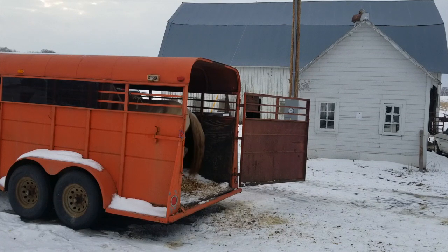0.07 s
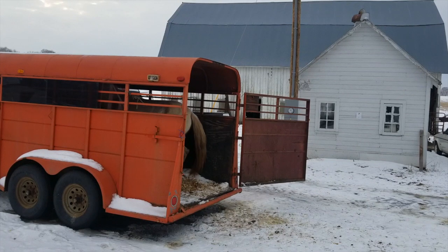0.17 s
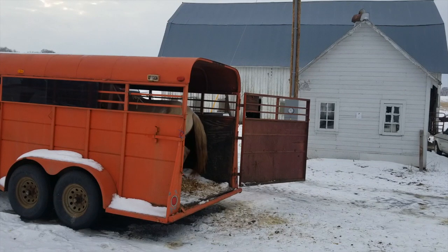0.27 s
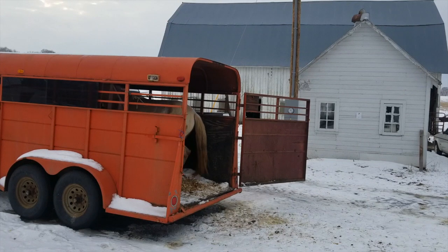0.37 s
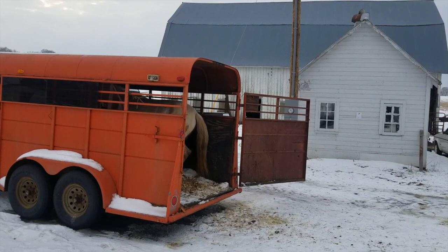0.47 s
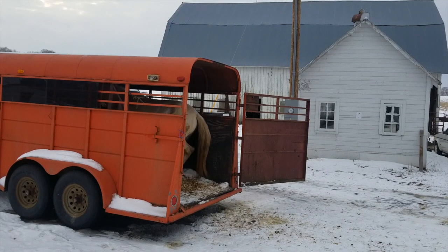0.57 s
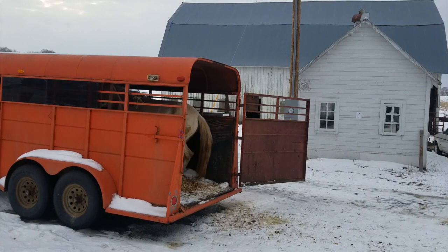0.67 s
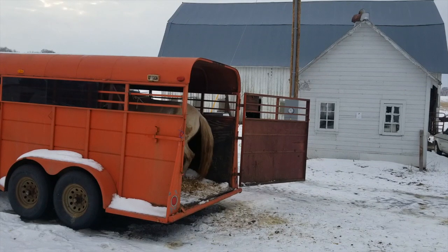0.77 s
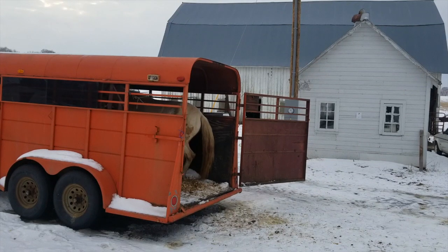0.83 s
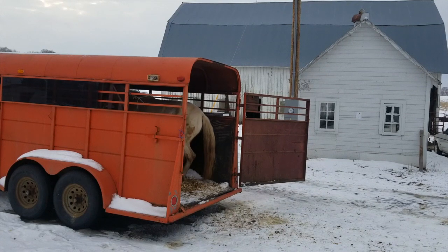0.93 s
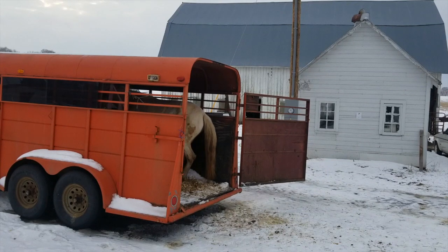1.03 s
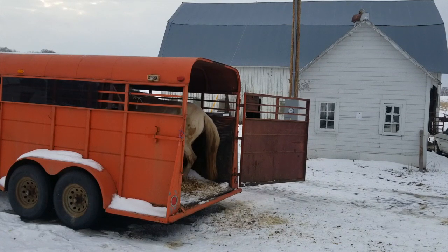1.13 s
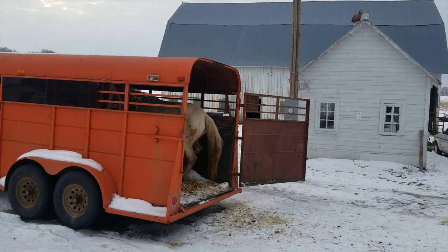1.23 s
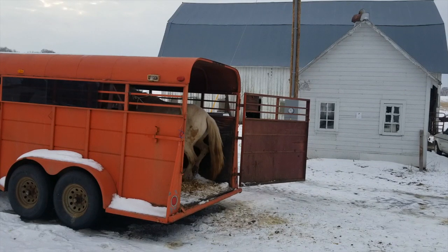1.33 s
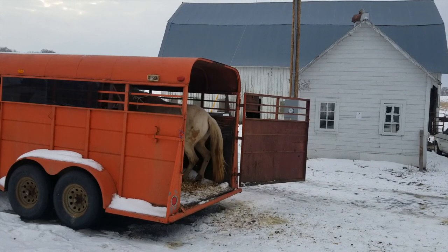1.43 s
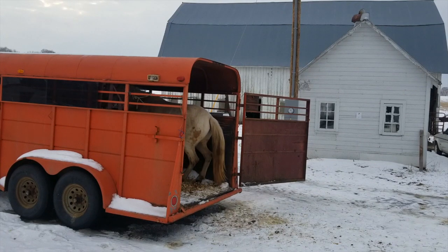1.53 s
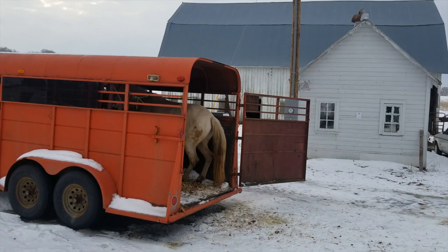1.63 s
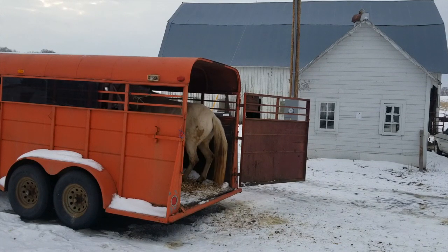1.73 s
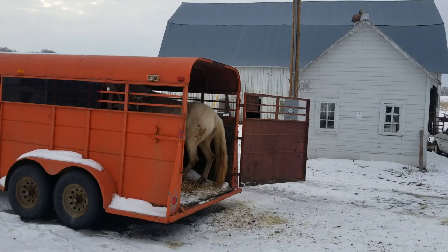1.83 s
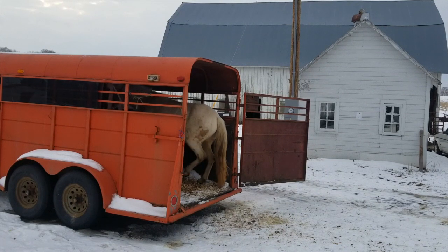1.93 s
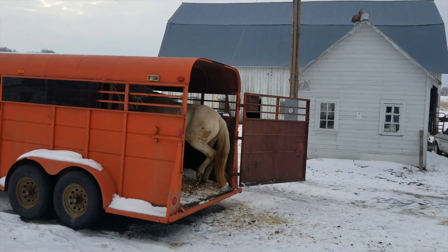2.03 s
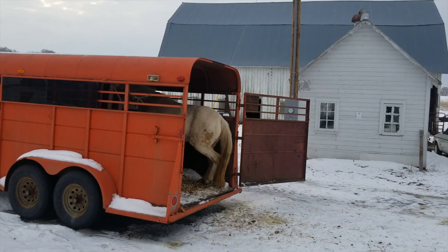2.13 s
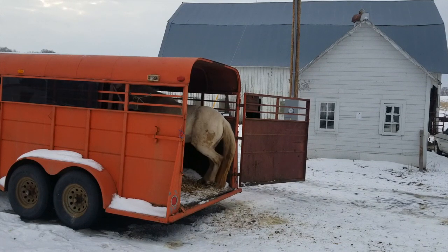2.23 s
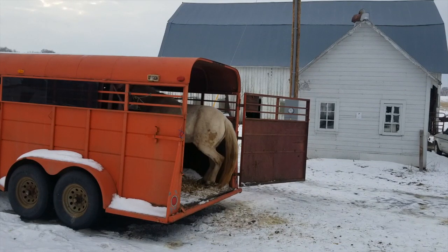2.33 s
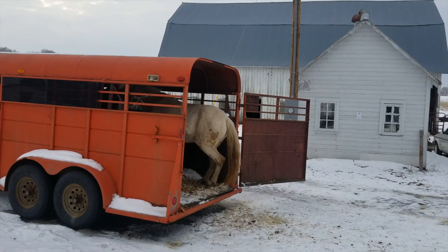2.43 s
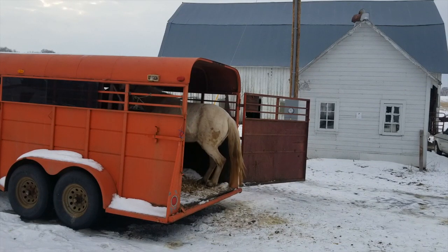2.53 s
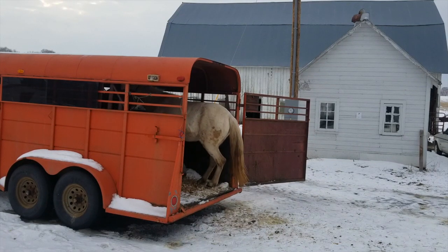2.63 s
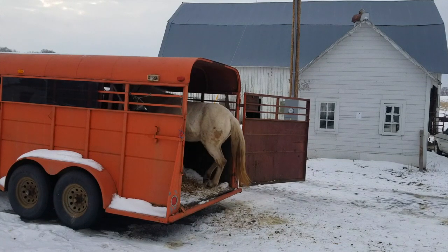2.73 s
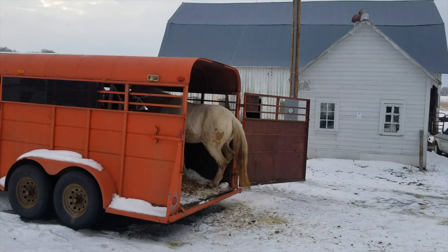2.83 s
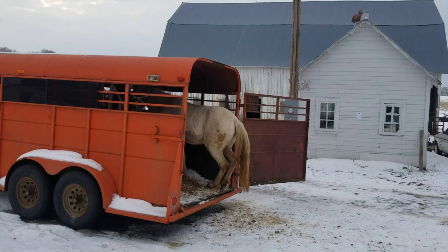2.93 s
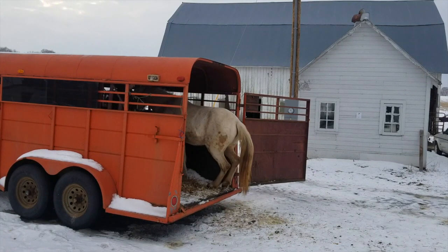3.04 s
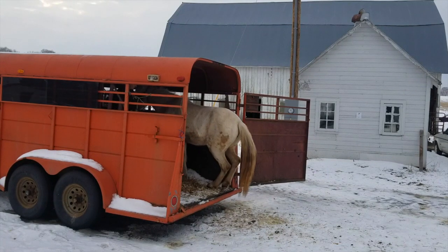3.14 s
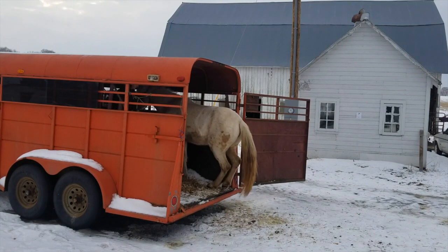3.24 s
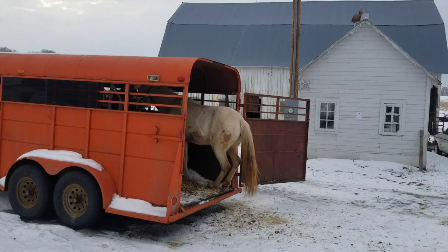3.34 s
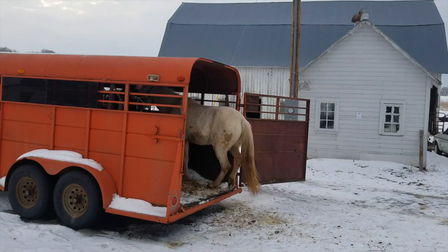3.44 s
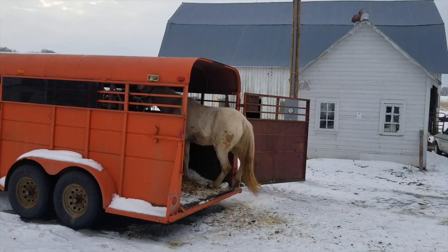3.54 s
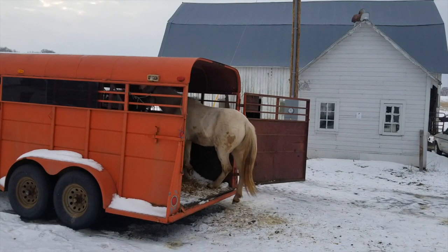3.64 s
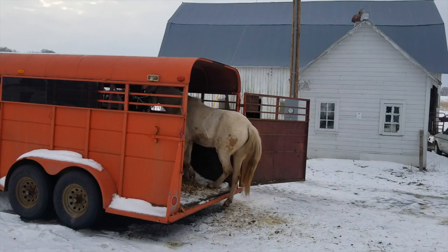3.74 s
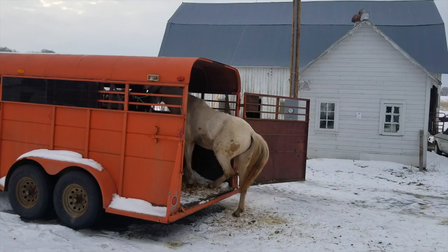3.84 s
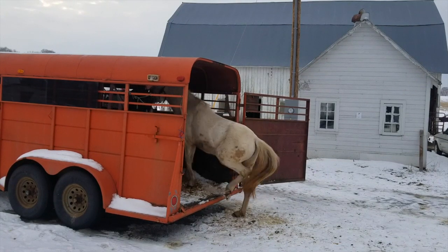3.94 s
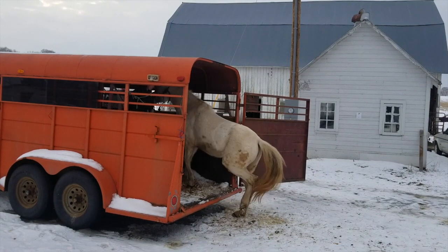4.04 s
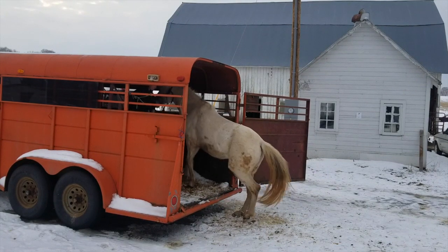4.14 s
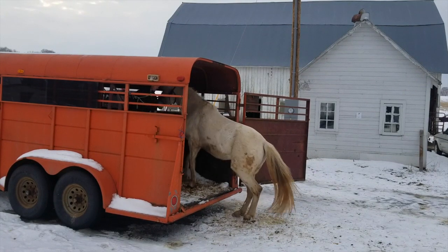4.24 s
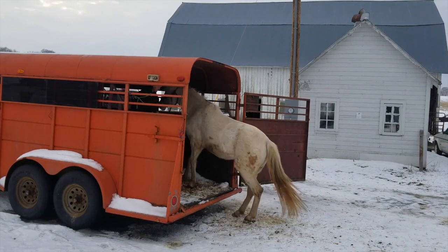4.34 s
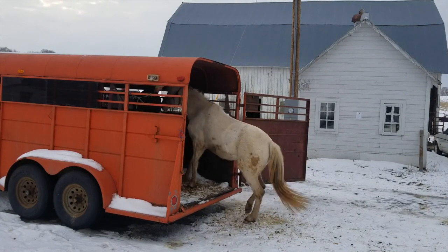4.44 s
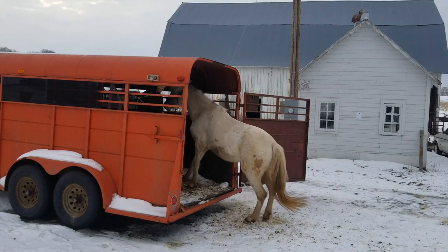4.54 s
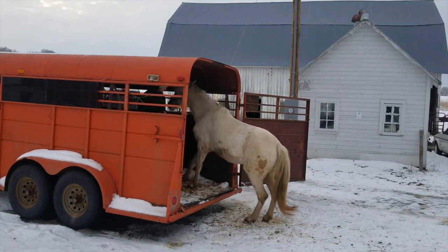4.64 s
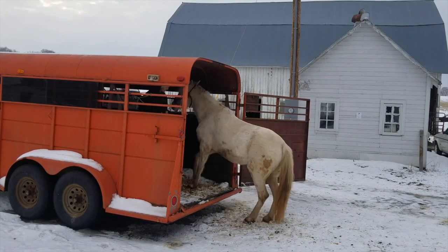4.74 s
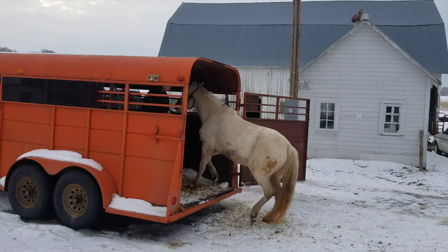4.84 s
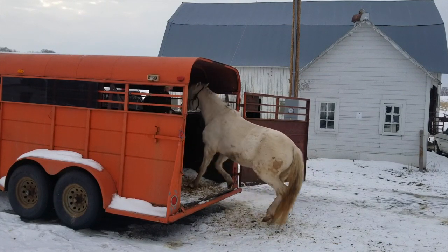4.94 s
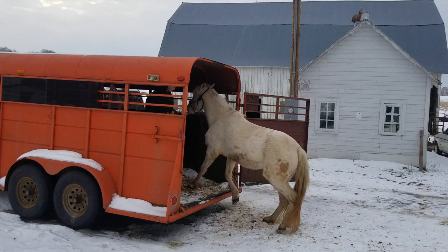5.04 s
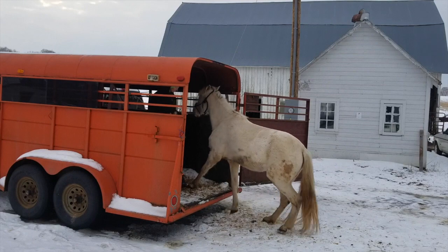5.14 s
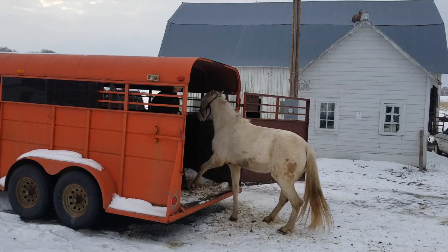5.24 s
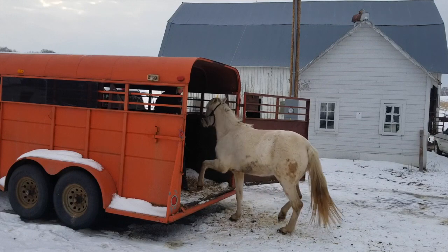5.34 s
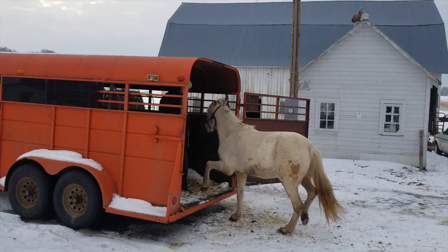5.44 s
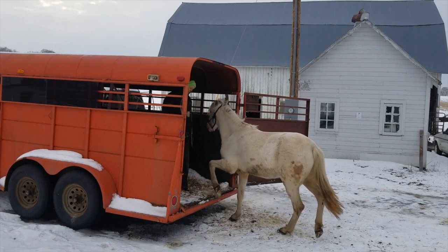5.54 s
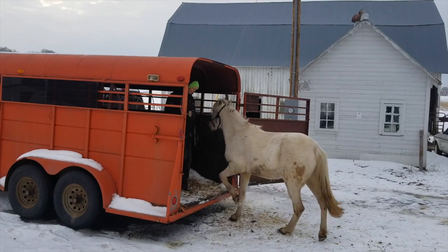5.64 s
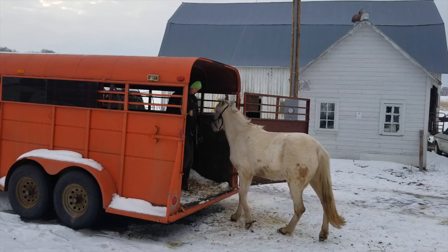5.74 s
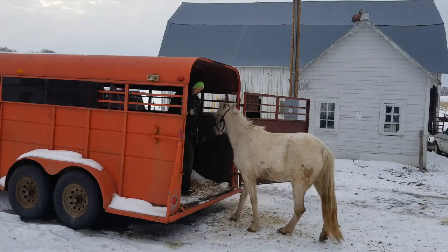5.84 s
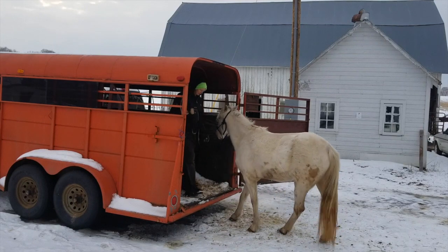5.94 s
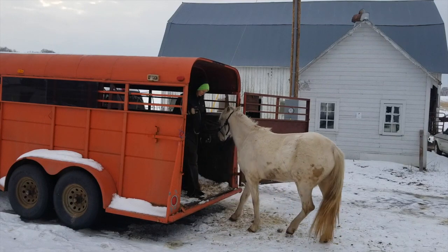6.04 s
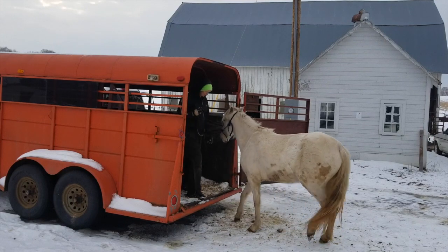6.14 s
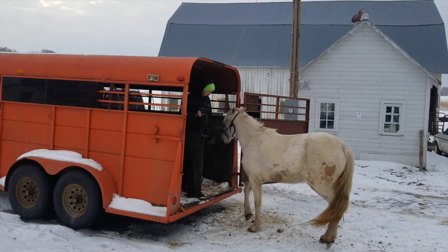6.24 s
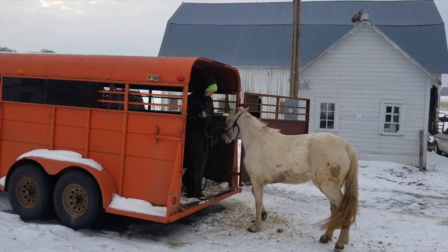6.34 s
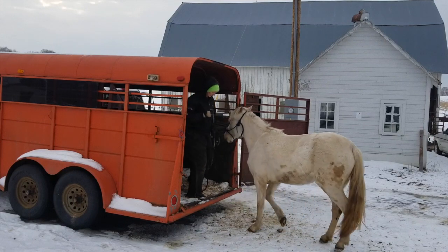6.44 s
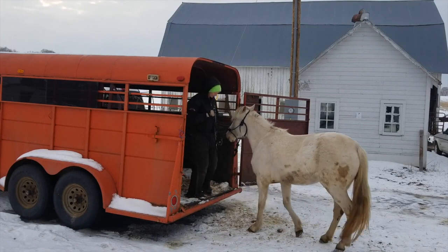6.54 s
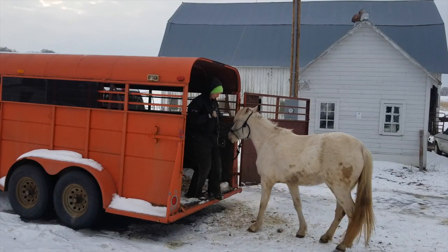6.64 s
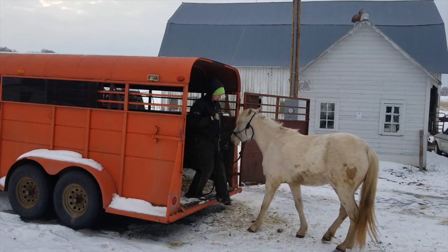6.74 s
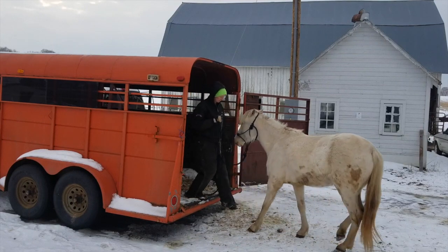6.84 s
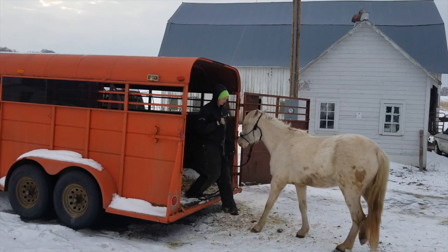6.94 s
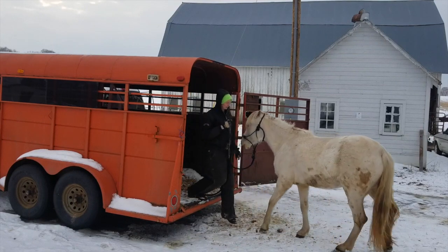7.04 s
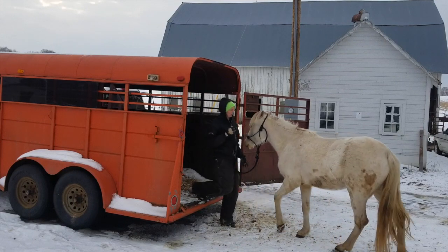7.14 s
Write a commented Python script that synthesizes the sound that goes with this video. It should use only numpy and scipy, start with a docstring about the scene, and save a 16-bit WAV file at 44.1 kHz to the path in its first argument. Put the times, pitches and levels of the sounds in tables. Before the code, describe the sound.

A horse backs out of a hollow steel trailer, hooves booming on the floor, then clopping and crunching onto frozen snow and straw.

```python
"""A snowy farmyard: a horse backs out of a steel stock trailer, heard from several metres away.
Hooves knock on the floor, whose boom and panel rings are sums of decaying sinusoids; filtered noise adds clatter.
Hollow hoof clops are short modal rings; scrapes and the crunch of frozen snow and straw are showers of clicks.
A grumbling trailer, faint echoes and a low outdoor rumble lie behind; all levels are set ahead of the microphones.
The left microphone is peaky and hisses, the right one is muffled."""
import sys
import numpy as np
from scipy import signal
from scipy.fft import rfft, irfft, next_fast_len
from scipy.io import wavfile

SR = 44100
rng = np.random.default_rng(int(sys.argv[2]) if len(sys.argv) > 2 else 0)


def file_out(sig):
    """Save sig as 16-bit WAV at sys.argv[1]."""
    # one column per channel
    cols = np.atleast_2d(sig).T
    # limit, then scale
    lim = np.clip(cols, -1, 1)
    pcm = np.round(lim * 32767).astype(np.int16)
    wavfile.write(sys.argv[1], SR, pcm)


N = 317299
T = np.arange(N) / SR  # time [s]

# Relative spectrum of the heavy trailer frame: (frequency [Hz], level [dB])
FRAME_SPECTRUM = [(15, -14.5), (30, -5.5), (43, -2), (55, 7), (72, -4), (100, 2), (130, -10.5), (200, -27),
                  (500, -68.5)]
# Relative spectrum of the sheet-metal walls: (frequency [Hz], level [dB])
SHEET_SPECTRUM = [(70, -27), (130, 4.5), (230, 0), (400, -5), (600, -13.5), (1000, -29.5), (1800, -25),
                  (4000, -47)]
# Relative spectrum of dull bedding and packed ground: (frequency [Hz], level [dB])
DULL_SPECTRUM = [(100, -16), (300, -10.5), (600, -2), (1050, 2), (1500, -2.5), (2100, -2), (3000, -17.5),
                 (8000, -21.5)]
# Relative spectrum of crisp straw, crust and grit: (frequency [Hz], level [dB])
CRISP_SPECTRUM = [(600, -3), (1500, 3), (2400, -0.5), (4000, 1.5), (7000, 5), (16000, -5.5)]


def undb(db):
    """Logarithmic level: decibels become an amplitude gain."""
    return 10 ** (np.asarray(db) / 20)


def unit(x):
    """Normalisation: a signal is scaled to rms 1."""
    return x / np.sqrt(np.mean(x ** 2))


def colour(x, points):
    """Minimum-phase filtering: the phase follows from a (frequency [Hz], level [dB]) response by the cepstrum."""
    size = 2 * next_fast_len(len(x) // 2 + 2048)
    hz, db = np.transpose(points)
    bin_hz = np.maximum(np.arange(size // 2 + 1) * SR / size, 1)
    response_db = np.interp(np.log(bin_hz), np.log(hz), db)
    cepstrum = irfft(np.log(undb(response_db)))
    # folding the cepstrum onto positive time makes the filter causal
    cepstrum[1:size // 2] *= 2
    cepstrum[size // 2 + 1:] = 0
    response = np.exp(rfft(cepstrum))
    return irfft(rfft(x, size) * response, size)[:len(x)]


def noise(points):
    """Random excitation: white noise is shaped by a spectrum and scaled to rms 1."""
    return unit(colour(rng.standard_normal(N), points))


def fade(t, t60):
    """Exponential damping: the amplitude falls 60 dB in t60 seconds."""
    return np.exp(-np.log(1000) * t / t60)


def grains(pressure, points, per_s, spread_db):
    """Fracture noise: random clicks of very unequal size, as strong as the pressure on them, are filtered."""
    sizes = undb(spread_db * np.minimum(rng.exponential(size=N), 4))
    happens = rng.random(N) < per_s / SR
    clicks = unit(happens * sizes * rng.choice([-1, 1], N))
    return colour(clicks * pressure, points) / np.std(colour(clicks, points))


def boom(t, hz, load_s, steep=9.6, ring_hz=70.6, ring_db=-14, ring_t60=1.84):
    """Forced, then free vibration: the floor swings as the weight comes down, then the whole box rings on."""
    swell = (t / load_s * np.exp(1 - t / load_s)) ** steep  # peaks at load_s
    ring = (1 - np.exp(-(t / load_s) ** 2)) * fade(t, ring_t60)
    phase = 2 * np.pi * (t - load_s)
    swing = swell * np.cos(hz * phase)
    box = undb(ring_db) * ring * np.cos(ring_hz * phase)
    return np.sqrt(2) * (swing + box)


def panels(t, scatter_db=3, detune=0.009):
    """Modal superposition: each blow drives the wall modes with its own strengths, signs and small detuning."""
    # Wall panel modes: (frequency [Hz], relative level [dB], 60 dB decay time [s])
    wall_modes = [(117.3, -4.5, 0.89), (152, -23, 0.39), (203.8, 7, 0.69), (224.8, 2.5, 0.75),
                  (243, 0.5, 0.68), (272, -3, 0.79), (309.6, -1.5, 0.87), (347.8, -0.5, 0.3),
                  (395, -10, 0.69), (456, -13.5, 0.26), (540, -22, 0.15), (685.3, -2.5, 0.17),
                  (723, -28, 0.067), (910, -7, 0.31), (1090, -34, 0.78), (1323, -42, 0.17)]
    hz, db, t60 = np.transpose(wall_modes)[:, :, None]
    strength, shift, sign = rng.standard_normal((3, len(wall_modes), 1))
    gain = undb(db + scatter_db * strength) * np.sign(sign)
    mode_hz = hz * (1 + detune * shift)
    rings = gain * fade(t, t60) * np.sin(2 * np.pi * mode_hz * t)
    return rings.sum(axis=0) / np.sqrt(np.sum(gain ** 2) / 2)


def trailer():
    """Impact excitation: each blow gives a knock, clattering sheet, ringing panels and the late floor boom."""
    # Steps and knocks on the floor: (time [s], boom drive [dB], boom pitch [Hz],
    # time for the weight to come down [s], panel drive [dB], knock drive [dB])
    blows = [(.092, -45.5, 83, .034, -70, -76), (.32, -51, 103, 0.014, -56.5, -67),
             (.472, -69, 77, .04, -52, -70), (.648, -37, 48, 0.0222, -52, -78),
             (.697, -45, 63, 0.028, -71, -74), (.815, -61, 70, 0.031, -57.5, -55),
             (1.435, -33.5, 131, .011, -45.5, -51), (1.468, -39, 92, .05, -55, -62),
             (1.742, -30.5, 86.6, .038, -48, -57), (1.868, -44, 64, 0.014, -53, -84),
             (2.116, -31, 75, .045, -37.5, -52), (2.164, -46, 73, 0.035, -56, -64),
             (2.531, -50, 67, 0.023, -79, -62), (2.706, -44.5, 91.5, 0.026, -58, -64),
             (2.944, -25, 67.6, .056, -50.5, -49.5), (3.098, -39, 69, .047, -59, -72),
             (3.325, -41.5, 74, 0.0534, -65, -56.5), (3.826, -47, 81, 0.0197, -49.5, -47),
             (3.853, -41, 71.5, .025, -56, -40.5), (3.892, -45, 72, 0.037, -46.5, -40),
             (5.013, -68, 80, 0.018, -61, -51.5), (5.258, -68, 70, .043, -51.5, -59),
             (5.511, -44, 86.5, .05, -45, -48), (5.961, -57, 70, 0.024, -62.5, -73),
             (6.026, -71, 60, .04, -56.5, -46), (7.126, -70, 80, 0.032, -46.5, -62)]
    # Relative spectrum of hoof against floor: (frequency [Hz], level [dB])
    knock_spectrum = [(100, -6), (250, 0.5), (450, 1), (900, -3.5), (1400, -2.5), (1900, -6), (3000, -16.5),
                      (8000, -55)]
    out = np.zeros(N)
    frame, sheet, knock = noise(FRAME_SPECTRUM), noise(SHEET_SPECTRUM), noise(knock_spectrum)
    for s, boom_db, boom_hz, load_s, panel_db, knock_db in blows:
        start = int(s * SR)
        span = slice(start, start + SR)
        t = T[span] - T[span][0]
        # straw cushions the weak steps, so their contact builds up slowly
        contact_s = np.clip(0.0009 * undb(0.64 * (-42.5 - knock_db)), .0006, .018)

        # the frame shudders at a level between those of panels and boom
        shudder_db = panel_db + 0.53 * (boom_db - panel_db) + 2.0
        shudder = undb(shudder_db) * frame[span] * (1 - np.exp(-t / 0.0064)) * fade(t, 0.71)

        clatter = sheet[span] * (fade(t, 0.14) + undb(-15.0) * fade(t, 1.0))
        walls = undb(panel_db) * (clatter + undb(-3.0) * panels(t))

        knock_decay = undb(2.5) * fade(t, 0.15) + undb(-20.5) * fade(t, 0.25)
        contact = undb(knock_db) * knock[span] * knock_decay

        # the swinging floor shakes loose fittings
        fittings = undb(-0.5) * sheet[span] + undb(-5.5) * knock[span]
        shaking = (1 - np.exp(-(t / load_s) ** 2)) * fade(t, 0.62)
        rattle = undb(-19.5) * fittings * shaking
        floor = undb(boom_db) * (boom(t, boom_hz, load_s) + rattle)

        onset = 1 - np.exp(-t / contact_s)
        out[span] += (floor + shudder + walls + contact) * onset
    return out


def clops():
    """Modal resonance: the hollow horn capsule of the hoof rings for a few cycles at each strike."""
    # Strikes on floor edge and sill: (time [s], pitch [Hz], ring drive [dB], 60 dB decay time at the pitch [s])
    strikes = [(1.4345, 970, -42, 0.039), (1.4355, 640, -42.5, 0.026), (1.463, 1334, -51, 0.035),
               (2.117, 416, -43.5, 0.046), (2.1173, 820, -52, 0.054), (2.148, 660, -49.5, .046),
               (2.946, 654, -58.5, 0.14), (3.865, 940, -41, 0.03), (3.893, 750, -42, 0.033),
               (4.553, 1010, -46, 0.017), (5.013, 1084, -41.5, .027), (5.4845, 957, -39.5, 0.029),
               (5.5065, 1230, -36, 0.015), (5.5085, 467, -34, .023), (5.519, 763, -45.5, 0.028),
               (5.816, 827, -45, 0.024), (6.027, 1380, -37, .006), (6.045, 505, -54.5, 0.096),
               (7.129, 320, -49, 0.043), (7.163, 630, -51, .05)]
    # Modes of the hoof capsule: (multiple of the pitch [ratio], relative level [dB])
    hoof_modes = [(1, 3), (1.47, -1), (2.4, -5), (3.2, -50)]
    out = np.zeros(N)
    t = T[:SR // 8]
    onset = 1 - np.exp(-t / 0.00012)
    for s, hz, db, t60 in strikes:
        ring = np.zeros(len(t))
        for ratio, mode_db in hoof_modes:
            # higher modes die away sooner
            decay = fade(t, t60 / np.sqrt(ratio))
            ring += undb(mode_db) * np.sin(2 * np.pi * hz * ratio * t) * decay
        start = int(s * SR)
        out[start:start + len(t)] += (np.sqrt(2) * undb(db) * ring * onset)[:N - start]
    return out


def drag():
    """Stick-slip friction: quick slips of a sliding forehoof keep its hollow resonance sounding."""
    # Pressure of the hoof dragged over the floor: (time [s], level [dB])
    drag_levels = [(5.24, -72), (5.30, -77), (5.38, -47.5), (5.43, -61), (5.47, -49), (5.50, -52),
                   (5.52, -69)]
    # Relative resonance of the dragged hoof: (frequency [Hz], level [dB])
    drag_spectrum = [(350, -5), (700, -16), (1030, 3.5), (1250, -6), (1600, -5), (2600, -27)]
    s, db = np.transpose(drag_levels)
    pressure = np.interp(T, s, undb(db), left=0, right=0)
    return grains(pressure, drag_spectrum, per_s=1300, spread_db=2.0)


def scuff(s, rise_s, fade_s, db, ground_db, ground_slope=0.55):
    """Nonlinear contact: powers of crackle and packed ground, the ground gaining more as the hoof presses harder."""
    # rise_s and fade_s are the times over which the amplitude changes by a factor e
    distance = np.maximum((s - T) / rise_s, (T - s) / fade_s)
    power = np.exp(-2 * np.minimum(distance, 20))
    # at ground_db both are equal; below it the ground loses ground_slope extra dB per dB
    packed_db = db + ground_slope * (db - ground_db)
    return undb([[db], [packed_db]]) ** 2 * power


def scuffs(crumble_db=-15, crumble_s=0.034):
    """Granular fracture: crunches crack at once and crumble on, slides swell; crust crackles, ground is dull."""
    # Hooves breaking through crust and grit: (time [s], peak level [dB], fade [s])
    crunches = [(1.435, -37, 0.0055), (2.117, -48.5, 0.013), (3.825, -44, 0.026), (3.892, -36.5, 0.0081),
                (3.904, -34.5, 0.0094), (4.1, -43, 0.007), (4.108, -39.5, 0.0085), (4.334, -53, 0.0023),
                (4.548, -45.5, .021), (4.774, -49, 0.0067), (4.998, -38, .003), (5.013, -37.5, 0.0035),
                (5.246, -38.5, .006), (5.259, -35.5, 0.0042), (5.488, -49, 0.036), (5.587, -43, 0.01),
                (5.7609, -37, 0.014), (5.817, -43.5, 0.0095), (6.0267, -40, 0.00056), (6.22, -47.5, 0.0066),
                (6.3215, -46, 0.027), (7.0805, -46.5, 0.0033)]
    # Hooves sliding through straw or snow: (time of peak [s], fade [s], peak level [dB])
    slides = [(0.086, 0.026, -53), (.652, 0.016, -48), (.815, 0.026, -59), (1.119, 0.026, -58.5),
              (1.755, 0.031, -53.5), (2.725, 0.04, -56.5), (3.372, 0.044, -58), (3.872, .02, -39.5),
              (4.397, .028, -54.5), (4.719, 0.098, -55.5), (5.314, 0.076, -45.5), (6.001, 0.026, -51),
              (6.168, .03, -58), (6.292, .014, -54.5), (6.609, .02, -55), (7.02, 0.081, -59),
              (7.157, 0.05, -51)]
    crunch_ground_db, slide_ground_db = -25, -36  # level at which packed ground equals the crackle
    power = np.zeros((2, N))
    for s, fade_s, db in slides:
        power += scuff(s, 0.89 * fade_s, fade_s, db, slide_ground_db)
    for s, db, fade_s in crunches:
        rise_s = min(0.0017, 0.34 * fade_s)  # short crunches build up faster
        power += scuff(s, rise_s, fade_s, db, crunch_ground_db)
        power += scuff(s, rise_s, crumble_s, db + crumble_db, crunch_ground_db)
    crisp, dull = np.sqrt(power)
    crackle = grains(crisp, CRISP_SPECTRUM, per_s=4000, spread_db=3.0)
    ground = grains(dull, DULL_SPECTRUM, per_s=2000, spread_db=4.5)
    return crackle + ground


def shifting(unrest_db=3.0, walls_db=-36, walls_follow=0.5):
    """Amplitude modulation: the trailer grumbles under the moving load while straw rustles unevenly."""
    # How hard the moving load rocks the trailer: (time [s], level [dB])
    rocking = [(0, -54), (.95, -62.5), (1.35, -66), (1.6, -49), (2.05, -59), (2.3, -51), (2.85, -58.5),
               (3.1, -52.5), (3.55, -58.5), (3.78, -64), (4.0, -54), (4.35, -62), (4.95, -67.5),
               (5.15, -57.5), (5.55, -54.5), (6.1, -61), (6.75, -66.5), (7.19, -68)]
    # Rustle under the moving legs: (time [s], dull bedding level [dB], crisp straw and snow level [dB])
    rustle = [(0, -84, -76.5), (.45, -80, -66.5), (.9, -78, -70.5), (1.35, -79, -71), (1.65, -66.5, -64.5),
              (2.2, -83, -72), (2.7, -71, -64.5), (3.05, -65, -74.5), (3.72, -88, -75.5),
              (4.05, -67, -63.5), (4.62, -71.5, -69.5), (4.95, -83, -85), (5.08, -70, -62),
              (5.38, -57, -60), (5.66, -70, -78), (5.88, -65, -61.5), (6.65, -78.5, -79.5),
              (7.19, -60, -72)]
    rocking_db = np.interp(T, *np.transpose(rocking))
    s, dull_db, crisp_db = np.transpose(rustle)
    # one slow random swing of level is common to all parts
    unrest = undb(unrest_db * noise([(1, 1.0), (12, -13.5), (30, -13.5), (200, -108)]))
    frame = unrest * undb(rocking_db)
    # the walls rise by walls_follow dB per dB of rocking
    sheet = unrest * undb(walls_db + walls_follow * rocking_db)
    dull = unrest * undb(np.interp(T, s, dull_db))
    crisp = unrest * undb(np.interp(T, s, crisp_db))
    straw = grains(dull, DULL_SPECTRUM, per_s=3000, spread_db=2.0)
    straw = straw + grains(crisp, CRISP_SPECTRUM, per_s=3000, spread_db=2.5)
    return frame * noise(FRAME_SPECTRUM) + sheet * noise(SHEET_SPECTRUM) + straw


def yard_echo(x, t60=0.2, wet_db=-19):
    """Diffuse reflection: convolution with decaying noise gives faint, dull scatter from gate and barn."""
    t = T[:SR // 2]
    tail = colour(rng.standard_normal(len(t)), [(60, -12.5), (300, 7.5), (1500, 0), (5000, -5), (15000, -12)])
    tail = tail * fade(t, t60) * (1 - np.exp(-t / 0.013))
    tail = tail / np.sqrt(np.sum(tail ** 2))  # unit energy
    return undb(wet_db) * signal.fftconvolve(x, tail)[:N]


def scene():
    """Superposition: both microphones hear horse and trailer, each with its own echo, over an outdoor rumble."""
    # Relative spectrum of the outdoor rumble: (frequency [Hz], level [dB])
    yard_spectrum = [(15, 5.5), (60, 3.5), (130, 1.5), (300, -6), (700, -22.5), (1500, -21), (5000, -70)]
    horse = trailer() + clops() + drag() + scuffs() + shifting()
    shared_rumble = undb(-70) * noise(yard_spectrum)
    channels = []
    for _ in range(2):
        own_rumble = undb(-69) * noise(yard_spectrum)
        channels.append(horse + yard_echo(horse) + shared_rumble + own_rumble)
    return np.array(channels)


def record(dry):
    """Transducer response: the left capsule resonates and hisses, the right is muffled; both add thin noise."""
    # Response of the left microphone: (frequency [Hz], level [dB])
    left_response = [(20, -2.5), (40, -2), (1500, 0), (2200, -5.5), (2800, 7), (4100, 12), (4600, 5),
                     (5100, -11), (6200, -3), (6800, -13.5), (7500, -28), (10500, -20.5), (12300, -9.5),
                     (13200, -12), (14500, -3), (15800, -12.5)]
    # Response of the right microphone: (frequency [Hz], level [dB])
    right_response = [(20, -4), (40, -5), (110, -4.5), (200, -7.5), (380, -8), (700, -9), (1200, -13),
                      (1600, -18), (2400, -23), (4000, -39), (16000, -68)]
    # Relative spectrum of the left microphone's hiss: (frequency [Hz], level [dB])
    hiss_spectrum = [(100, -27), (1800, -15), (2200, -6.5), (2800, 3), (3300, -5.5), (4300, -15),
                     (5000, -29), (6200, -14), (7400, -35.5), (11000, -27.5), (13200, -15), (13950, -7),
                     (14140, -1.5), (14330, -4), (15800, -10.5)]
    top_hz = 15800  # upper band limit
    left = colour(dry[0], left_response) + undb(-61.5) * noise(hiss_spectrum)
    # the trailer stands to the left, so its sound reaches the right port 0.07 ms later
    right = np.interp(T - .00007, T, colour(dry[1], right_response))
    electronic_floor = undb(-76.0) * rng.standard_normal((2, N))
    out = np.array([left, right]) + electronic_floor
    low_pass = signal.ellip(10, .2, 70, top_hz, fs=SR, output="sos")
    return signal.sosfilt(low_pass, out)


dry = scene()
out = record(dry)
file_out(out)
```